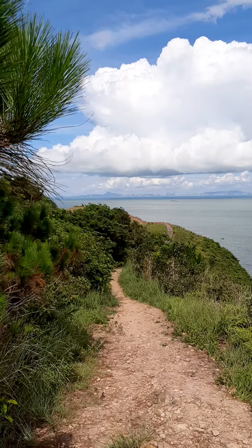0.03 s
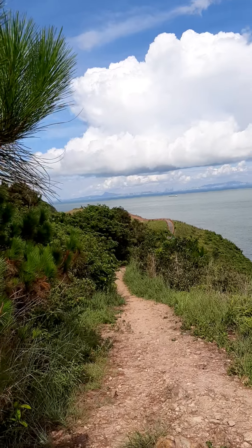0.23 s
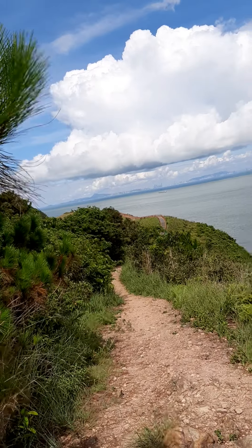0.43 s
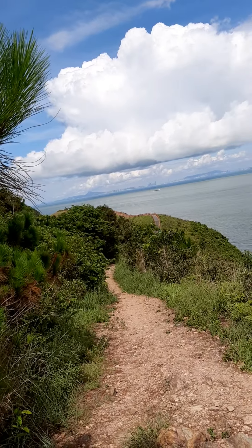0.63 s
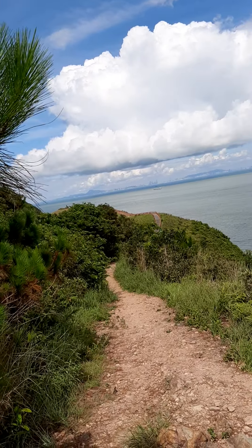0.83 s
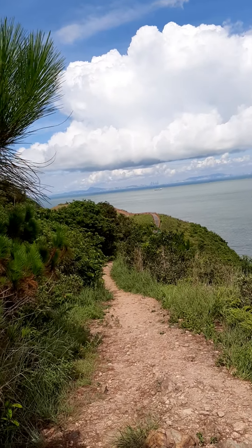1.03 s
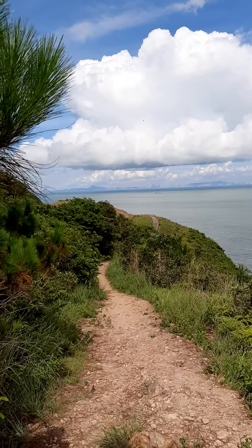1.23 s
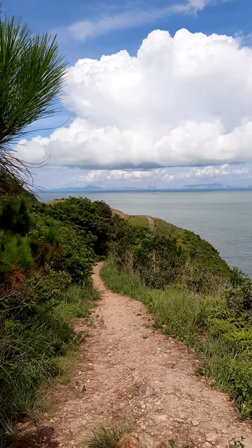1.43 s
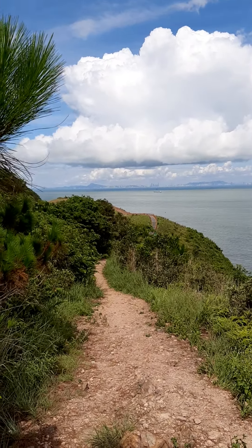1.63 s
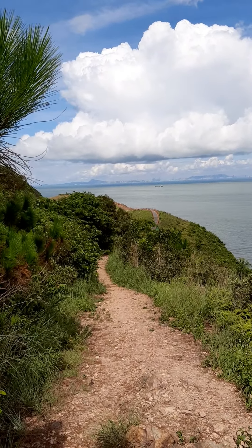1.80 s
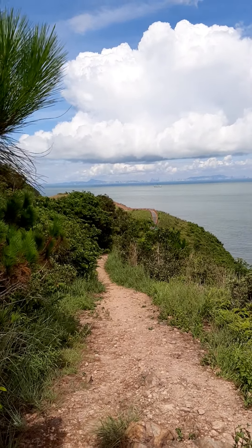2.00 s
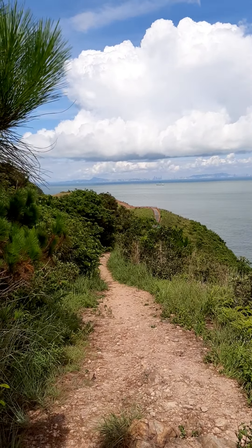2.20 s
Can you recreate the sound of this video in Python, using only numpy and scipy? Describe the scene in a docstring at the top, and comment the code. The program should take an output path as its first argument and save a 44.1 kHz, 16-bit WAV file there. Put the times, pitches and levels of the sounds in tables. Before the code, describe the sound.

A nearby cicada starts abruptly at about 0.07 s and buzzes without pause until 2.25 s: harsh, high and finely pulsed, above a faint low hum. Its tone and left-right balance shift as the microphone turns. A second cicada, a distant chorus and light breeze continue behind. Very faint: a bird whistle at 0.4 s, scuffs near 1 s, a tick at 1.2 s, a stronger scuff at 1.75 s.

```python
"""From an abrupt start a cicada buzzes in a pine beside a hillside path: two tymbals buckle in turn, over a hum
of sines locked to their rate. Its echoes drift and its bright bands shift as the microphone turns.
Throughout, a slower second cicada, a far chorus of filtered noise and a light noise breeze lie behind it.
A faint arched bird whistle comes at 0.4 s, two soft scuffs of noise around 1 s,
one decaying sine tick at 1.2 s and a third, stronger scuff at 1.75 s."""
import sys
import numpy as np
from scipy import signal
from scipy.fft import rfft, irfft, next_fast_len
from scipy.io import wavfile
from scipy.ndimage import map_coordinates

SR = 44100
rng = np.random.default_rng(int(sys.argv[2]) if len(sys.argv) > 2 else 0)


def dump(signal):
    """Clip the signal to [-1, 1] and save it as 16-bit WAV at the path in sys.argv[1]."""
    limited = np.clip(np.atleast_2d(signal).T, -1, 1)
    pcm = np.round(limited * 32767).astype(np.int16)
    wavfile.write(sys.argv[1], SR, pcm)


N = 99445

FLUTTER_HZ = 11.37  # speed of both the rate flutter and the second tymbal's sway


def amp(db):
    """Decibels to gain."""
    return 10 ** (np.asarray(db) / 20)


def unit(x):
    """Each channel at rms 1."""
    return x / np.sqrt(np.mean(x ** 2, axis=-1, keepdims=True) + 1e-20)


def clock():
    """The time of each sample in seconds."""
    return np.arange(N) / SR


def curves(rows):
    """One value per sample for each column after the time."""
    times, *columns = np.transpose(rows)
    return [np.interp(clock(), times, column) for column in columns]


def wobble(rate):
    """A smooth random curve, rate knots a second."""
    knots = rng.standard_normal(int(N * rate / SR) + 4)
    return map_coordinates(knots, [clock() * rate])


def panned(pan_db):
    """Left and right gains of constant power; positive leans left."""
    gains = amp(np.array([pan_db, -pan_db]).reshape(2, -1) / 2)
    return gains / np.sqrt(np.mean(gains ** 2, axis=0))


def filtered(x, response):
    """x times a complex response of frequency."""
    size = 2 * next_fast_len(N // 2 + SR // 10)  # padded so that tails do not wrap round
    return irfft(rfft(x, size) * response(np.fft.rfftfreq(size, 1 / SR)), size)[..., :N]


def coloured(x, points):
    """x through a causal, minimum-phase filter drawn through (frequency [Hz], level [dB]) points."""
    def response(hz):
        f, db = np.transpose(points)
        cepstrum = irfft(np.log(amp(np.interp(np.log(hz + 1), np.log(f), db))))
        half = len(cepstrum) // 2
        folded = np.r_[cepstrum[0], 2 * cepstrum[1:half]]
        return np.exp(rfft(folded, 2 * half))
    return filtered(x, response)


def resonance(f, hz, width_hz):
    """The response of one causal resonance, with a peak gain of 1."""
    return 1j * f * width_hz / (hz * hz - f * f + 1j * f * width_hz)


def resonated(x, hz, width_hz):
    """x through one resonance."""
    return filtered(x, lambda f: resonance(f, hz, width_hz))


def noise(points, alike):
    """Coloured stereo noise of rms 1; alike is the share of power common to both sides."""
    white = rng.standard_normal((3, N))
    pair = np.sqrt(alike) * white[0] + np.sqrt(1 - alike) * white[1:]
    return unit(coloured(pair, points))


def pulses(times, sizes, order=8):
    """Impulses placed between samples by a windowed sinc."""
    at = times[:, None] * SR
    index = np.floor(at).astype(int) + np.arange(1 - order, order + 1)
    window = np.cos(np.pi * (index - at) / (2 * order)) ** 2
    taps = np.sinc(index - at) * window * sizes[:, None]
    return np.bincount(np.clip(index, 0, N).ravel(), taps.ravel(), N + 1)[:N]


def delayed(x, ms):
    """x after a delay that may change with time."""
    return map_coordinates(x, [np.arange(N) - ms * SR / 1000], order=5)


def tymbal_cycles(rate_hz, rise_hz_per_s, wander_hz):
    """Running count of tymbal cycles: a base rate with a steady rise, a slight flutter and random wander."""
    t = clock()
    flutter_hz = 0.27 * np.sin(2 * np.pi * FLUTTER_HZ * t)
    rate = rate_hz + rise_hz_per_s * t + flutter_hz + wander_hz * wobble(22)
    return np.cumsum(rate) / SR


def tymbals(cycles):
    """In each cycle every rib buckles once and rings briefly through the body."""
    # tymbal ribs: (place in the cycle [0-1], delay [ms], level [dB], ring [Hz], ring width [Hz])
    ribs = [(0,0,0,7800,2800), (0,.33,-5.6,7800,2800), (0,.374,-3,7800,2800), (.5115,0,0,7800,2800),
            (.5115,.254,-3,7800,2800), (.5115,.508,-7.2,7800,2800)]
    # colour of the body: (frequency [Hz], level [dB])
    body_colour = [(1500,-27), (3000,-26.5), (3850,-34), (4100,-21), (4320,-18.5), (4950,2), (5600,-2.5),
                   (6300,1.5), (6750,3.5), (7400,-2), (8700,-7.5), (9700,5), (10600,-11), (11800,-26),
                   (13200,-10.5), (15300,-4)]
    jitter_us, scatter_db = 2.3, 0.57  # random spread of each buckle's timing and strength
    sway_ms, lag_ms_per_s = 0.015, 0.022
    beats = np.arange(1, int(cycles[-1]) + 1)
    song = np.zeros(N)
    for place, delay_ms, db, ring_hz, width_hz in ribs:
        slip, size = rng.standard_normal((2, SR // 20))[:, :len(beats)]
        times = np.interp(beats + place, cycles, clock(), right=N)
        times = times + delay_ms / 1e3 + jitter_us * slip / 1e6
        if place > 0:  # the second tymbal sways and drifts in time: odd and even overtones trade strength
            sway = sway_ms * np.sin(2 * np.pi * FLUTTER_HZ * times)
            times = times + (lag_ms_per_s * times - sway) / 1e3
        clicks = pulses(times, amp(db + scatter_db * size))
        song += resonated(clicks, ring_hz, width_hz)
    return unit(coloured(song, body_colour))


def thicket(x, t60_s):
    """Short diffuse scatter from needles and branches, different on each side."""
    t = np.arange(SR // 10) / SR
    tail = rng.standard_normal((2, len(t))) * amp(-60 * t / t60_s)
    return unit(signal.fftconvolve(x[None], tail, axes=1)[:, :N])


def with_echoes(song, echoes):
    """The direct song plus reflections off nearby surfaces, whose delays drift."""
    t = clock()
    return song + sum(amp(db) * delayed(song, ms + drift * t) for ms, drift, db in echoes)


def emphasised(pair):
    """As the microphone turns, three bands change: the brightest, the lower edge and the right's middle."""
    # centre of the brightest band: (time [s], frequency [Hz])
    brightest = [(.08, 7770), (.85, 7960), (1.15, 7250), (1.4, 7200), (2.25, 7350)]
    # gain at the buzz's lower edge: (time [s], level [dB])
    low_edge = [(.08, 1.5), (.7, 4.5), (1.2, -0.5), (2.25, 2.5)]
    # gain of the middle band at the right microphone: (time [s], level [dB])
    right_middle = [(.08,-2), (.35,10), (.7,14), (1.27,-2), (1.5,0.5), (1.92,6.5), (2.25,0.5)]
    centre_hz, = curves(brightest)
    edge_db, = curves(low_edge)
    middle_db, = curves(right_middle)
    # the bright band moves by a crossfade between two fixed resonances
    low_hz, high_hz = centre_hz.min(), centre_hz.max()
    share = (centre_hz - low_hz) / (high_hz - low_hz + 1)
    bright = share * resonated(pair, high_hz, width_hz=570)
    bright = bright + (1 - share) * resonated(pair, low_hz, width_hz=570)
    edge = (amp(edge_db) - 1) * resonated(pair, hz=4950, width_hz=400)
    middle = (amp(middle_db) - 1) * resonated(pair, hz=6300, width_hz=600)
    right_only = [[0], [1]]
    return pair + middle * right_only + edge + amp(7) * bright


def near_cicada(cycles):
    """The direct buzz, its drifting echoes and the scatter of the pine."""
    # loudness of the buzz before its trim: (time [s], level [dB], left over right [dB])
    loudness = [(0.08, -22, 0), (0.21, -23, 1.5), (0.42, -24, -3.5), (0.69, -23.5, -2.5), (1.05, -23, 1),
                (1.18, -21, -3.5), (1.23, -24, 3.5), (1.7, -23.5, 0), (1.74, -23.5, 2), (2.13, -23, 0),
                (2.23, -22.5, 1), (2.25, -24, -3)]
    # echoes at each microphone: (delay at time zero [ms], drift [ms/s], level against the direct buzz [dB])
    left_echoes = [(1.272,-.003,-15.4), (1.573,-.021,-17.7)]
    right_echoes = [(.273,.002,-8), (.316,.047,-13), (.15,.094,-14), (.777,-.026,-12), (1.16,.06,-11)]
    trim_db, right_lag_ms, thicket_db = 2.5, 0.23, -11
    song = tymbals(cycles)
    left = with_echoes(song, left_echoes)
    right = delayed(with_echoes(song, right_echoes), right_lag_ms)
    pair = unit(np.array([left, right])) + amp(thicket_db) * thicket(song, t60_s=0.014)
    level_db, pan_db = curves(loudness)
    return amp(level_db + trim_db) * panned(pan_db) * unit(emphasised(pair))


def hum(cycles):
    """Low overtones: sines locked to the near cicada's tymbal rate, with another mix on each side."""
    # course of the hum before its trim: (time [s], level [dB], left over right [dB])
    hum_course = [(0.08, -47.5, 9.5), (0.71, -45, -10), (1.09, -51, 15.5), (1.19, -50, 7),
                  (1.25, -49.5, 25), (1.64, -52, 30), (2.0, -51.5, 51), (2.07, -52.5, 20),
                  (2.25, -51.5, 14)]
    # overtone mix on each side: (multiple of the tymbal rate, relative level [dB])
    left_overtones = [(1, -16.5), (2, 5), (3, -10), (4, 0), (5, -9), (6, -4), (7, -5.5), (8, -7.5),
                      (9, -18), (10, -15.5)]
    right_overtones = [(1, -8.5), (2, 1.5), (3, -10), (4, -7), (5, -13), (6, -23), (7, -16), (8, -15)]
    trim_db, left_lag_ms = 0.5, 0.27
    phases = rng.random(20)  # in cycles, shared by both sides

    def tone(overtones):
        return sum(amp(db) * np.sin(2 * np.pi * (round(k) * cycles + phases[round(k)])) for k, db in overtones)

    pair = np.array([delayed(tone(left_overtones), left_lag_ms), tone(right_overtones)])
    level_db, pan_db = curves(hum_course)
    return amp(level_db + trim_db) * panned(pan_db) * unit(pair)


def second_cicada():
    """A slower cicada deeper in the scrub, heard only as diffuse scatter."""
    song = tymbals(tymbal_cycles(rate_hz=202.6, rise_hz_per_s=0, wander_hz=0.645))
    song = thicket(resonated(song, hz=7100, width_hz=10000), t60_s=0.0098)
    return amp(-37) * panned(pan_db=-5) * song


def far_chorus():
    """Many far cicadas blurred into one band of noise."""
    # colour of the chorus: (frequency [Hz], relative level [dB])
    chorus_colour = [(2500, -38.5), (4000, -35.5), (4900, -9), (6500, -2.5), (7600, -4.5), (9000, -30),
                     (11500, -13.5), (15500, -48)]
    return amp(-37) * noise(chorus_colour, alike=0.099)


def scuffs():
    """Soft scuffs on the path: resonant noise under smooth bell-shaped swells."""
    # scuff peaks: (time [s], level [dB])
    scuff_peaks = [(.975, -58.5), (1.08, -58.5), (1.752, -53.5)]
    spread_s = 0.027  # from the peak to 1/e
    white = rng.standard_normal(N)
    grit = unit(filtered(white, lambda f: resonance(f, hz=1450, width_hz=480) ** 2))
    return grit * sum(amp(db) * np.exp(-((clock() - s) / spread_s) ** 2) for s, db in scuff_peaks)


def tick():
    """One dry tick: a sine that starts at once and dies in a few milliseconds."""
    start_s, level_db, pitch_hz, t60_s = 1.206, -32.5, 3899, 0.0047
    age = np.maximum(clock() - start_s, 0)
    return amp(level_db - 60 * age / t60_s) * np.sin(2 * np.pi * pitch_hz * age)


def bird():
    """A far bird's whistle: pitch and level rise and fall together in one arch."""
    middle_s, arch_s = 0.4, 0.055  # silent beyond 1.41 times arch_s either side of the middle
    peak_hz, fall_hz = 1380, 71.1  # fall_hz is the drop at arch_s from the middle
    arch = np.minimum(((clock() - middle_s) / arch_s) ** 2, 2)
    whistle = np.sin(2 * np.pi * np.cumsum(peak_hz - fall_hz * arch) / SR)
    return amp(-53) * (1 - arch / 2) * whistle


def breeze():
    """Light buffeting on the microphone over the hush of hillside and sea, both of coloured noise."""
    # course of the rumble before its trim: (time [s], level [dB])
    gusts = [(0.08, -55), (0.27, -65), (0.41, -55), (0.68, -67), (0.91, -62), (0.97, -72), (1.1, -61.5),
             (1.34, -71), (1.59, -61), (1.65, -73), (1.81, -58.5), (1.94, -79), (2.03, -59.5),
             (2.25, -60.5)]
    # colours of rumble and hush: (frequency [Hz], relative level [dB])
    rumble_colour = [(20, -28), (40, -16), (65, 7), (100, 1), (170, -6), (400, -32)]
    air_colour = [(60, 0), (200, -5.5), (380, 2.5), (600, -3), (1400, -5.5), (2200, -14.5), (3200, -28),
                  (8000, -12.5)]
    rumble_trim_db, air_db = 5, -53.5
    level_db, = curves(gusts)
    rumble = amp(level_db + rumble_trim_db) * panned(pan_db=-7.0) * noise(rumble_colour, alike=0.55)
    return rumble + amp(air_db) * noise(air_colour, alike=0.19)


def scene():
    """All sources at the two microphones."""
    cycles = tymbal_cycles(rate_hz=215.25, rise_hz_per_s=0.86, wander_hz=0.026)
    cicadas = near_cicada(cycles) + hum(cycles) + second_cicada() + far_chorus()
    small_sounds = scuffs() + tick() + bird()  # the same on both sides
    return cicadas + small_sounds + breeze()


def record(dry):
    """The sound cuts in abruptly, then a steep filter removes everything above the band limit."""
    start_s, top_hz = 0.0685, 15850
    return filtered(dry * (clock() > start_s), lambda hz: hz < top_hz)


dry = scene()
out = record(dry)
dump(out)
```